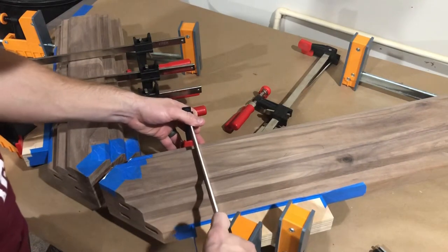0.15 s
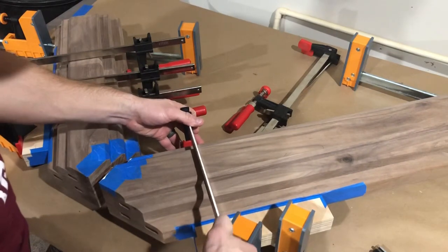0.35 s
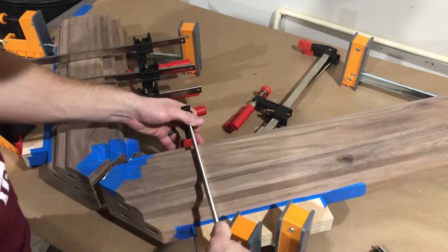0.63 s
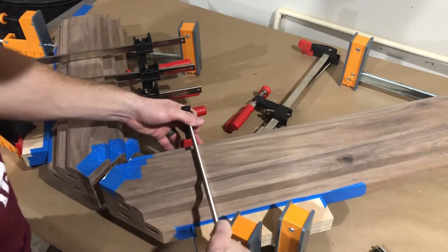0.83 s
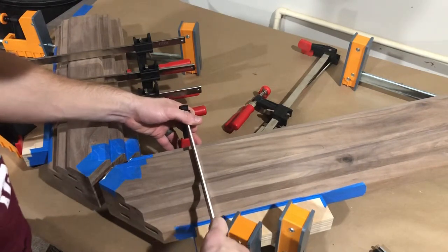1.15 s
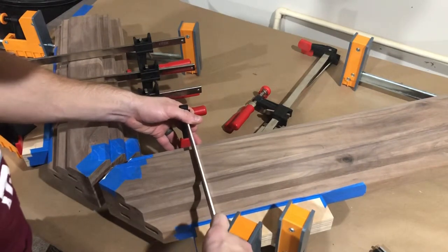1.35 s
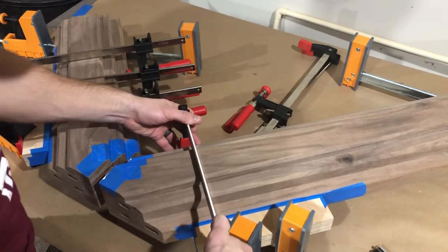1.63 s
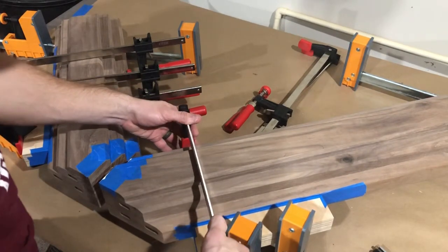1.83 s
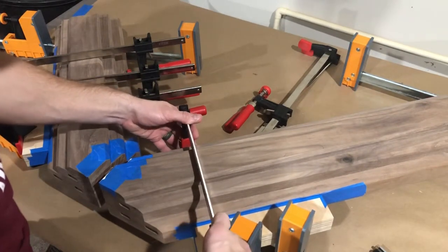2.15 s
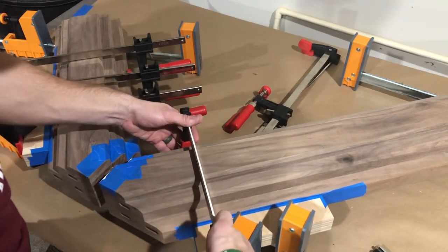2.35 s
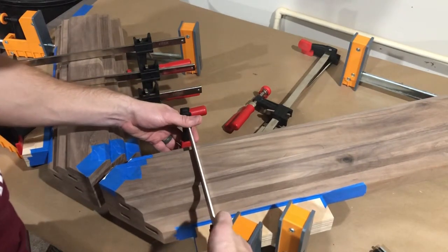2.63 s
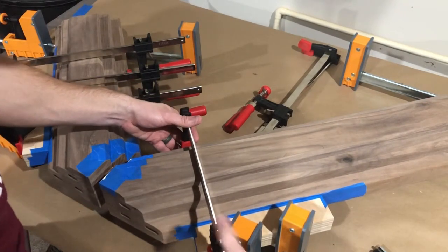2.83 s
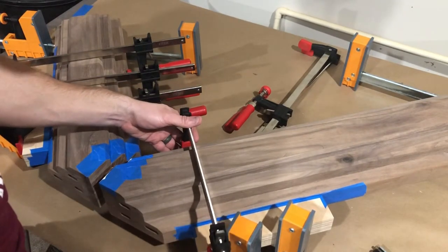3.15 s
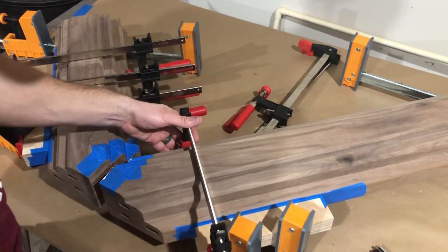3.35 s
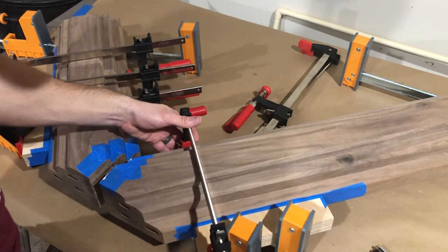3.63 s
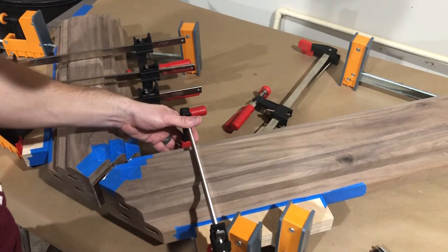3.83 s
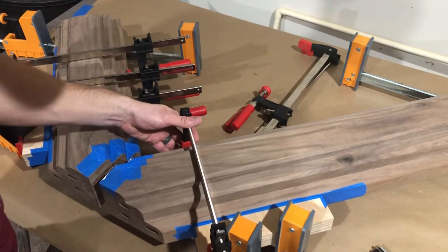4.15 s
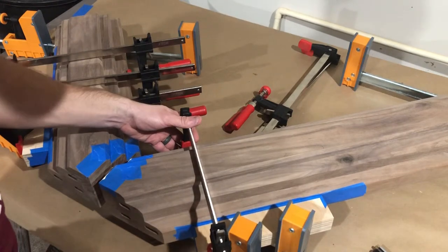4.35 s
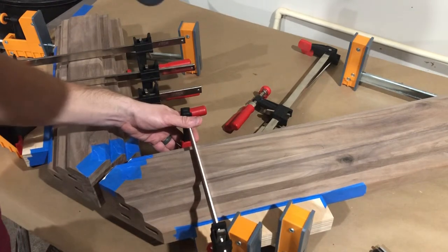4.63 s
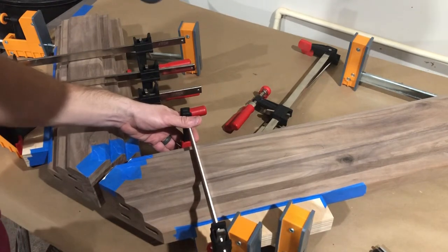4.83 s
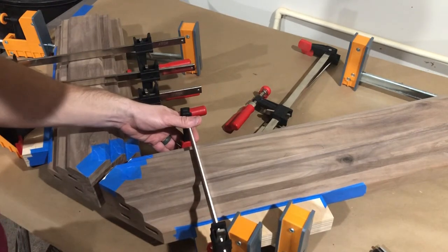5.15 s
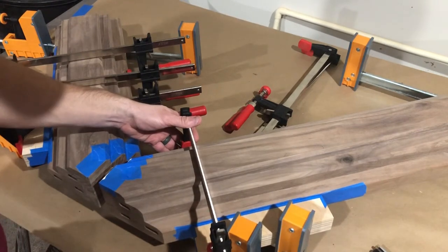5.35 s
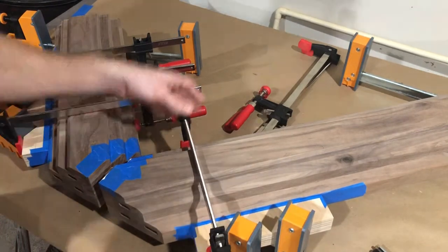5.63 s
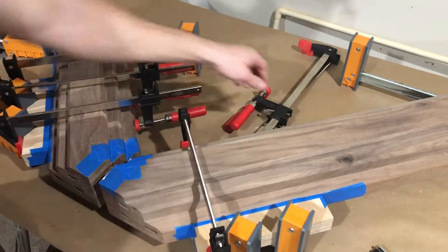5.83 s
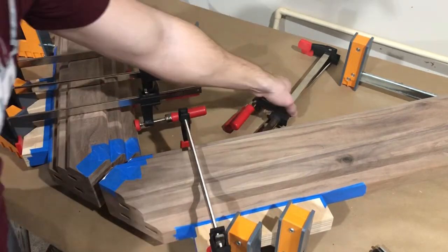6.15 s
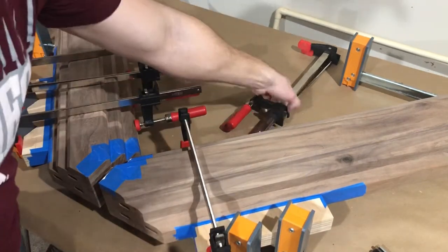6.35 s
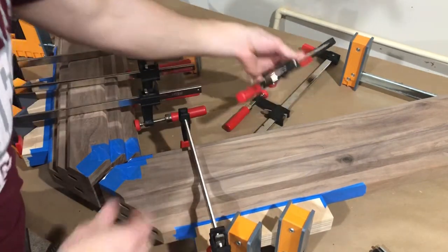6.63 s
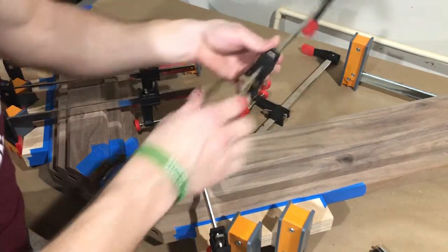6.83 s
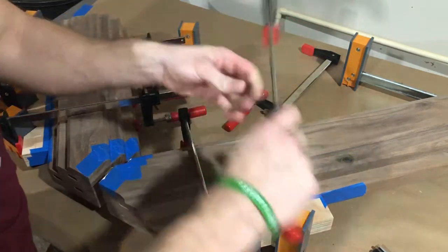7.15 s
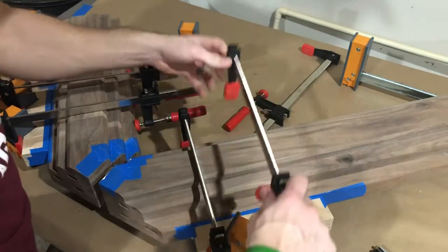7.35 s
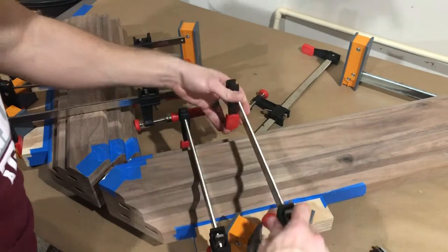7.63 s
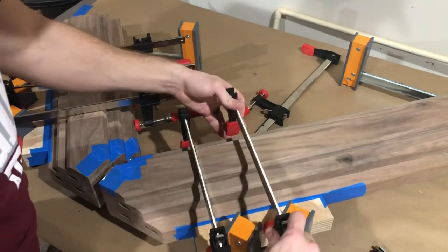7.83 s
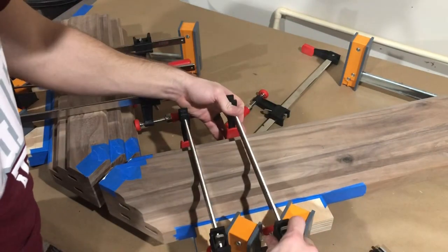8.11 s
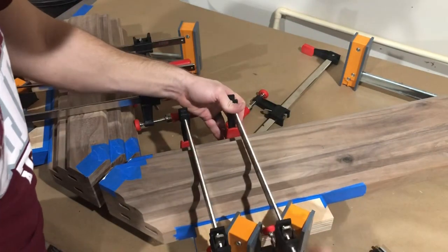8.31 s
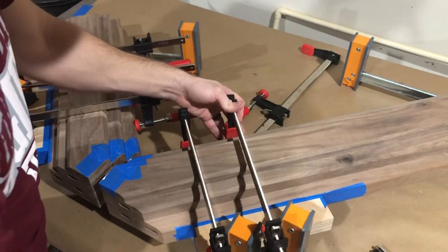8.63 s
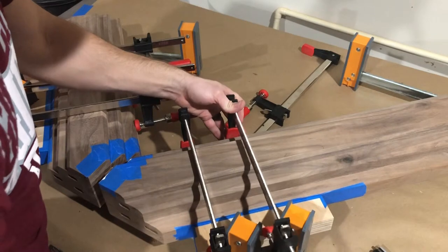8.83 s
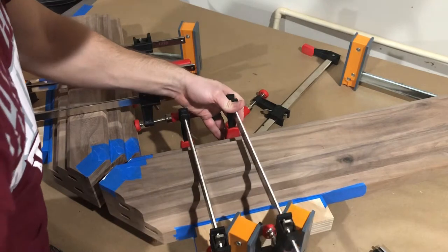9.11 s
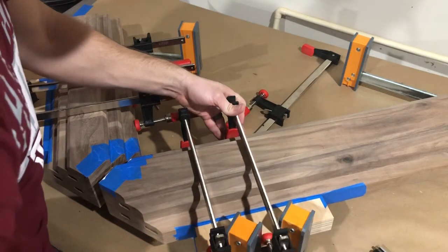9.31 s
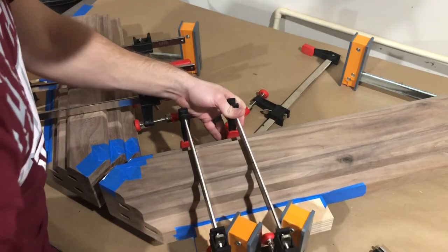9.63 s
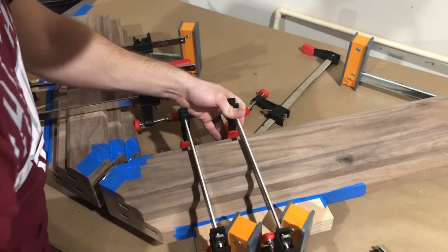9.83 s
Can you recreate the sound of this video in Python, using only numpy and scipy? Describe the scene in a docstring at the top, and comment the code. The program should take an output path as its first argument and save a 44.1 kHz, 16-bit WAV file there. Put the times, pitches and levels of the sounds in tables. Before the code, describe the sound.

Sharp metal clicks and dull wooden knocks as clamps are set across a panel, with a shoe scuff and a short squeak.

```python
"""Steel bar clamps are set across a glued wooden panel on a bench in a small, bare-walled workshop.
Over a low rumble, hands shift a clamp, its jaws click and chatter on the bar, and panel and bench knock.
From 3.4 s a screw rasps in its threads, then creaks. Near 6 s a shoe scuffs, a second clamp is dragged
over and a shirt rustles. More clicks and knocks follow; at 9.6 s the screw pad slips and squeaks as it
is tightened. The walls ring after every sound."""
import sys
import numpy as np
from scipy import signal
from scipy.fft import rfft, irfft
from scipy.io import wavfile
from scipy.ndimage import uniform_filter1d

SR = 44100
rng = np.random.default_rng(int(sys.argv[2]) if len(sys.argv) > 2 else 0)


def log_audio(samples):
    """Write samples as a 16-bit WAV file to the path given in sys.argv[1]."""
    # one column per channel
    frames = np.atleast_2d(samples).T
    # limit to full scale, then quantise
    limited = np.clip(frames, -1, 1)
    pcm = np.round(limited * 32767).astype(np.int16)
    wavfile.write(sys.argv[1], SR, pcm)


N = 440118
TIME_S = np.arange(N) / SR


def undb(db):
    """Decibels to gain."""
    return 10 ** (np.asarray(db) / 20)


def unit(x):
    """Scale to rms 1."""
    return x / np.sqrt(np.mean(x ** 2))


def energy(x, seconds):
    """Scale to the energy of an rms-1 sound of that length."""
    return x * np.sqrt(seconds * SR / np.sum(x ** 2))


def lookup(rows, hz):
    """Read (f/Hz, value) rows on a log-frequency axis."""
    f, value = np.transpose(rows)
    return np.interp(np.log(hz + 1), np.log(f), value)


def colour(x, gain_db, size=4096):
    """Minimum-phase filter with response gain_db(f/Hz)."""
    cepstrum = irfft(np.log(undb(gain_db(np.arange(size // 2 + 1) * SR / size))))
    cepstrum[1:size // 2] *= 2
    cepstrum[size // 2 + 1:] = 0
    return signal.fftconvolve(x, irfft(np.exp(rfft(cepstrum))))[:len(x)]


def ring(modes, t):
    """Decaying modes, struck at a new place each time."""
    hz, db, t60_s = np.transpose(modes)[:, :, None]
    detune, polarity, scatter = rng.standard_normal((len(modes), 3)).T[:, :, None]
    phase = 2 * np.pi * hz * (1 + 0.0056 * detune) * t
    gain = np.sign(polarity) * undb(db + 2 * scatter)
    return np.sum(gain * np.sin(phase) * np.exp(-np.log(1000) * t / t60_s), axis=0)


def add(track, start_s, sound):
    """Mix a sound in at start_s."""
    i = max(int(start_s * SR), 0)
    track[i:i + len(sound)] += sound[:N - i]


def strokes(rows, attack_s, release_s):
    """Envelope of (t/s, hold/s, level/dB) strokes; attack and release are times per 20 dB."""
    gains = []
    for start_s, hold_s, db in rows:
        before = np.maximum(start_s - TIME_S, 0) / attack_s
        after = np.maximum(TIME_S - start_s - hold_s, 0) / release_s
        gains.append(undb(db - 20 * np.minimum(before + after, 10)))
    return np.max(gains, axis=0)


def friction(pressure, spectrum, rate_hz, scatter_db, jerk_db):
    """Tiny catches of uneven size, coming in jerks, coloured by what they shake."""
    catches = (rng.random(N) < rate_hz / SR) * rng.standard_normal(N)
    catches *= undb(scatter_db * rng.standard_normal(N))
    jerks = unit(uniform_filter1d(uniform_filter1d(rng.standard_normal(N), size=500), size=500))
    return pressure * unit(colour(catches * undb(jerk_db * jerks), lambda f: lookup(spectrum, f)))


# background spectrum: f/Hz, level/dB
AIR_SPECTRUM = [(15, -66), (25, -47), (53, 4), (92, 0.5), (157, -4.5), (249, -14.5), (293, -9),
                (427, -12.5), (545, -20.5), (659, -22), (775, -27), (936, -22), (1130, -26), (14800, -33.5),
                (16000, -34)]
def air(level_db=-66):
    """Steady low rumble and thin hiss of the workshop."""
    return undb(level_db) * unit(colour(rng.standard_normal(N), lambda f: lookup(AIR_SPECTRUM, f)))


# grip shifts: t/s, hold/s, level/dB
GRIP_SHIFTS = [(0.01, 0.033, -59.5), (1.1, 0.094, -65.5), (1.57, 0.068, -62), (3.4, 0.15, -65.5),
               (4.06, 0.062, -60.5), (5.36, 0.063, -62), (7.14, 0.27, -66.5), (8.85, 0.084, -61),
               (9.71, 0.016, -57)]
# rubbing on wood: f/Hz, level/dB
GRIP_SPECTRUM = [(40, -20), (140, 4.5), (320, -2), (700, -7.5), (1300, -17), (3000, -25), (8000, -31),
                 (16000, -47)]
def hand_rub(holding_db=-70.5):
    """Hands shift the clamp on the wood and rub faintly between shifts."""
    pressure = np.hypot(strokes(GRIP_SHIFTS, attack_s=0.12, release_s=0.18), undb(holding_db))
    return friction(pressure, GRIP_SPECTRUM, rate_hz=1500, scatter_db=0, jerk_db=3.5)


# hard contacts: t/s, level/dB over 10 ms, chatter/ms, main f/Hz, second f/Hz, ring/dB, tilt/(dB/octave)
CONTACTS = [(0.05, -54, 10, 8020, 5660, 17.5, -7), (0.317, -31, 4.5, 10050, 5000, 8, -3),
            (0.348, -43.5, 15.3, 7400, 5820, 18, -7), (0.4252, -46, 4, 3200, 5000, 12, -3.5),
            (0.439, -47.5, 5.1, 7250, 9550, 12, -6), (1.438, -45.5, 2.8, 7800, 8870, 14, -4.5),
            (2.152, -64, 13, 1410, 4830, 17, -6), (2.293, -44.5, 18, 11300, 2800, 17, -1.5),
            (2.31, -38, 27.5, 11400, 2940, 17, -1.5), (2.33, -33, 11.4, 13200, 10300, 11, -4.5),
            (2.336, -34, 8, 9700, 13400, 10, -3.5), (3.282, -61, 2.5, 3720, 6850, 20, -3),
            (4.3613, -58.5, 2.4, 14170, 15200, 15, -7.5), (4.648, -41, 3, 1857, 2740, 8.5, -11),
            (4.939, -68, 0.93, 8600, 6000, -4, 1), (5.349, -62, 19, 1540, 9900, 15, -5),
            (5.857, -48.5, 4, 2700, 1900, 21, -1), (5.965, -38.5, 1.14, 2140, 2970, 25, 0),
            (6.2265, -41, 1.2, 11540, 7560, 16, -3.5), (6.441, -57, 2.2, 5530, 7500, 23, -8),
            (6.471, -49, 2.5, 5500, 8300, 16, -6), (6.733, -59.5, 1.3, 2000, 3320, 21, -5.5),
            (7.047, -55.5, 2.9, 4060, 2480, 13, -12.5), (7.147, -54.5, 13, 4140, 2290, 6, -8.5),
            (7.233, -47, 7.7, 7700, 6100, 20, -4.5), (7.2406, -44.5, 1.9, 11200, 7700, 13, -3),
            (7.2805, -44, 2, 14100, 5750, 12, -4.5), (7.289, -46, 4.8, 6160, 7600, 16, -1.5),
            (7.485, -61.5, 3, 4400, 5500, 12, -12), (7.955, -49, 6.2, 1930, 1435, 19, -15.5),
            (7.9667, -34, 3.8, 5450, 14400, 15, -2), (7.9762, -28.5, 2.4, 5600, 7600, 7.5, 0),
            (8.065, -46, 6.2, 6260, 5300, 8, -6), (8.6737, -27.5, 2.4, 8260, 6000, 21, 1),
            (8.7192, -39, 0.57, 8050, 5630, 32, -8), (8.723, -39.5, 6.2, 7100, 8400, 13, -4.5),
            (8.8205, -46.5, 4, 8600, 5950, 5, -4), (9.052, -53.5, 5.2, 5760, 8200, 13, -10.5),
            (9.0657, -33, 1.14, 7540, 11500, 8, 1), (9.2766, -43, 2.8, 11350, 10000, 23.5, -7),
            (9.294, -35, 1.44, 3650, 4250, 6.5, -3.5), (9.504, -35, 3.7, 8760, 3330, 5.5, -5.5)]
# steel contact: f/Hz, level/dB
STEEL_SPECTRUM = [(300, -23), (1000, -16.5), (2400, -10), (3800, -3.5), (5700, -0.5), (7700, -1.5),
                  (9500, -6), (12000, -5.5), (15500, -6)]
# bar and jaw modes: f/Hz, level/dB, t60/s
BAR_MODES = [(3080, -8, 0.058), (3504, -23.5, 0.051), (5560, -2, 0.053), (5600, -4.5, 0.072),
             (7100, -26.5, 0.63), (7570, -1, 0.023), (10300, -0.5, 0.066), (11200, -10, 0.12)]
def steel_clicks(contacts, bar_db=-20, jaw_db=-26, jaw_t60_s=0.13, width_hz=430, bounce_db=4.5):
    """Steel chatters on steel; two jaw pitches and the bar ring on. Returns direct sound and room send."""
    direct, send = np.zeros(N), np.zeros(N)
    t = np.arange(SR // 4) / SR
    impulse = signal.unit_impulse(len(t))
    for start_s, db, chatter_ms, main_hz, second_hz, ring_db, tilt_db in contacts:
        age = t * 1000 / chatter_ms
        envelope = (1 - np.exp(-age / 0.042)) / (1 + np.exp(np.minimum((age - 0.6) / 0.55, 50)))
        bounces = undb(bounce_db * np.repeat(rng.standard_normal(len(t)), 16)[:len(t)])
        chatter = energy(envelope * bounces * rng.standard_normal(len(t)), 1)
        snap = 2 * np.exp(-chatter_ms / 2.05) * energy(impulse, 1)  # dominates brief contacts
        jaw_modes = [(main_hz, 0, jaw_t60_s), (second_hz, 0, jaw_t60_s)]
        ringing = undb(bar_db) * energy(ring(BAR_MODES, t), 1)
        ringing += undb(jaw_db) * energy(ring(jaw_modes, t), 1)
        peak = lambda f, hz: 1 / (1 + ((f - hz) / width_hz) ** 2)
        jaw = lambda f: ring_db * (peak(f, main_hz) + 0.75 * peak(f, second_hz))
        steel = lambda f: lookup(STEEL_SPECTRUM, f) + tilt_db * np.log2(np.maximum(f, 1200) / 5000)
        click = colour(energy(chatter + snap, 0.68) + ringing, lambda f: steel(f) + jaw(f))
        add(direct, start_s, undb(db) * energy(click, 0.01))
        # walls gather all directions: smoother spectrum
        diffuse = colour(energy(impulse, 0.49) + ringing, lambda f: steel(f) + 0.61 * jaw(f))
        send_db = -6 + 1.34 * np.log2(chatter_ms / 3.2)
        add(send, start_s + chatter_ms / 1000 / 3, undb(db + send_db) * energy(diffuse, 0.01))
    return direct, send


# blows on panel and bench: t/s, level/dB over 30 ms, centre f/Hz, damping time/ms
BLOWS = [(0.317, -48.5, 650, 100), (0.353, -50.5, 526, 38), (0.647, -57, 490, 50), (0.706, -59.5, 320, 58),
         (1.445, -56, 516, 140), (2.159, -56.5, 890, 58), (2.297, -49.5, 524, 90), (2.343, -40.5, 612, 9.2),
         (2.347, -35, 283, 38), (3.208, -53, 734, 126), (3.282, -59, 850, 33), (3.322, -55.5, 287, 50),
         (3.918, -59.5, 238, 42), (4.115, -57, 256, 130), (4.538, -51, 233, 240), (4.648, -38.5, 1006, 22),
         (4.651, -38, 344, 125), (6.09, -49.5, 136, 88), (6.169, -54, 410, 16), (7.731, -64, 490, 90),
         (7.982, -42, 289, 240), (8.079, -48.5, 354, 35), (8.591, -53, 440, 63), (8.68, -48.5, 490, 240),
         (8.73, -46.5, 620, 64), (8.8, -51.5, 615, 76), (9.068, -52, 613, 53), (9.281, -53, 465, 72),
         (9.5025, -40, 666, 10), (9.507, -36, 216, 42)]
# panel and bench modes: f/Hz, level/dB, t60/s
WOOD_MODES = [(70.3, 10.5, 0.52), (136.5, 5.5, 0.23), (156, 0, 0.78), (184, -11, 0.13), (212, 2.5, 0.33),
              (249.2, -1, 0.24), (307.7, -4, 0.37), (351, 1.5, 0.13), (390.7, -4.5, 0.25),
              (490, -0.5, 0.15), (626.5, 3.5, 0.1), (734, -1.5, 0.036), (710, -7, 0.034),
              (883, -2.5, 0.064), (958, 6, 0.025), (1250, 0, 0.0305), (1385, 1.5, 0.043), (1616, 2, 0.0254)]
def wood_knocks(crack_db=-2, crack_s=0.0094, crack_hz=1500, skirt_db=10):
    """Blows ring the wood and hands damp it; the freer the panel, the more of its modes speak."""
    track, t = np.zeros(N), np.arange(SR // 3) / SR
    for start_s, db, centre_hz, damp_ms in BLOWS:
        burst = rng.standard_normal(len(t)) * np.exp(-t / crack_s)
        crack = colour(burst, lambda f: -10 * np.log10(1 + (f / crack_hz) ** 2))
        body = energy(ring(WOOD_MODES, t), 0.99) + undb(crack_db) * energy(crack, 0.24)
        damped = body * np.exp(-t * 1000 / damp_ms)
        spread_oct = 0.66 * (damp_ms / 100) ** 0.46
        band_db = lambda f: -skirt_db * np.log(1 + (np.log2((f + 1) / centre_hz) / spread_oct) ** 2 / 2)
        add(track, start_s, undb(db) * energy(colour(damped, band_db), 0.03))
    return track


# handle turns: t/s, hold/s, level/dB
TURNS = [(3.38, 0.09, -77), (3.84, 0.056, -80), (4.02, 0.031, -74), (4.18, 0.068, -73.5), (4.56, 0.29, -75),
         (8.44, 0.03, -78)]
# thread rasp: f/Hz, level/dB
THREAD_SPECTRUM = [(800, -1), (2500, -6), (6000, 3), (10000, -3.5), (15500, 3)]
def thread_rasp():
    """Screw threads rub as the handle turns. Returns sound and motion envelope."""
    turning = strokes(TURNS, attack_s=0.067, release_s=0.12)
    return friction(turning, THREAD_SPECTRUM, rate_hz=2200, scatter_db=1.5, jerk_db=2), turning


def steel_ticks(turning, arm_motion, screw_db=-6.5, jaw_db=-11):
    """Stray ticks from the screw as it turns and the loose jaw as the arm moves."""
    shaking = undb(screw_db) * turning + undb(jaw_db) * arm_motion
    return friction(shaking, STEEL_SPECTRUM, rate_hz=39, scatter_db=6, jerk_db=2)


def screw_creak(start_s=4.082, period_s=0.014, count=4, level_db=-65.5, swell_db=2.5):
    """The loaded screw catches at even intervals, strongest mid-run. Returns rows like CONTACTS."""
    chatter_ms, ring_hz, ring_db, tilt_db = 5.4, 2600, 9, -12
    return [(start_s + k * period_s, level_db + swell_db * np.sin(np.pi * k / count),
             chatter_ms, ring_hz, ring_hz, ring_db, tilt_db) for k in range(count)]


# shoe scuffs: t/s, hold/s, level/dB
SCUFFS = [(5.822, .015, -57), (5.894, 0.015, -38), (5.968, 0.012, -35.5)]
# sole friction: f/Hz, level/dB
SCUFF_SPECTRUM = [(150, -33), (450, -13), (850, -8.5), (1300, -1.5), (1900, -0.5), (2900, -3), (4300, -8.5),
                  (7500, -8), (12000, -11.5), (15500, -13)]
def shoe_scuff():
    """A sole scrapes the floor in quick strokes."""
    pressure = strokes(SCUFFS, attack_s=0.046, release_s=0.079)
    return friction(pressure, SCUFF_SPECTRUM, rate_hz=7000, scatter_db=3.5, jerk_db=2)


# pulls of the clamp: t/s, hold/s, level/dB
PULLS = [(5.96, 0.042, -59), (6.24, 0.022, -53), (6.335, 0.04, -44), (6.435, 0.022, -47.5),
         (6.525, 0.015, -46)]
# clamp on bench: f/Hz, level/dB
DRAG_SPECTRUM = [(35, -37), (60, -35), (124, 5.5), (178, -5.5), (247, 7), (276, -7.5), (316, -0.5),
                 (519, -8.5), (563, -7.5), (794, -19), (1600, -37), (2080, -82), (3520, -120)]
def clamp_drag():
    """The clamp catches and slides over the paper-covered bench with a low rumble."""
    pressure = strokes(PULLS, attack_s=0.074, release_s=0.054)
    return friction(pressure, DRAG_SPECTRUM, rate_hz=480, scatter_db=1, jerk_db=2.5)


# arm movements: t/s, hold/s, level/dB
ARM_MOVES = [(6.19, 0.1, -59), (6.5, .14, -66.5), (6.79, 0.12, -64), (7.08, 0.19, -64.5),
             (7.3, 0.037, -60.5)]
# cloth friction: f/Hz, level/dB
CLOTH_SPECTRUM = [(530, -26), (900, 0), (1040, -5), (1810, -4.5), (2190, -1), (2690, -6.5), (3230, -1),
                  (4100, 1), (5350, -8), (7140, -7.5), (9310, -11.5), (15100, -16), (16000, -32)]
def shirt_rustle():
    """Cloth rubs as the arm moves. Returns sound and motion envelope."""
    arm_motion = strokes(ARM_MOVES, attack_s=0.3, release_s=0.19)
    return friction(arm_motion, CLOTH_SPECTRUM, rate_hz=14000, scatter_db=4, jerk_db=2.5), arm_motion


# screw pad slips: t/s, f/Hz, peak level/dB
PAD_SLIPS = [(9.644, 5700, -26), (9.6555, 5600, -25.5), (9.663, 5910, -37), (9.700, 5615, -18),
             (9.7052, 5500, -17.5), (9.709, 5850, -23)]
def screw_squeak(half_width_ms=2.57, jitter_hz=35, octave_db=-19, tone_send_db=-9, octave_send_db=-20):
    """The screw pad slips in short, near-pure chirps. Returns direct sound and room send."""
    slip_s, slip_hz, _ = np.transpose(PAD_SLIPS)
    envelope = sum(undb(db) * np.exp(-((TIME_S - peak_s) * 1000 / half_width_ms) ** 2)
                   for peak_s, _, db in PAD_SLIPS)
    jitter = unit(uniform_filter1d(rng.standard_normal(N), size=80))
    pitch_hz = np.interp(TIME_S, slip_s, slip_hz) + jitter_hz * jitter
    phase = 2 * np.pi * np.cumsum(pitch_hz) / SR
    tone, octave = envelope * np.sin(phase), envelope * np.sin(2 * phase)
    return tone + undb(octave_db) * octave, undb(tone_send_db) * tone + undb(octave_send_db) * octave


# workshop decay: f/Hz, t60/s
WALL_DECAY = [(100, 0.74), (400, 0.71), (1200, 0.71), (3500, 0.65), (6000, 0.56), (10000, 0.43),
              (15000, 0.34)]
def wall_echoes(send, build_s=0.00053, early_db=3, early_s=0.017):
    """Dense echoes off bare walls, strongest at first; the treble dies soonest."""
    t, hz = np.arange(SR) / SR, np.arange(SR // 2 + 1)
    noise, tail = rfft(rng.standard_normal(SR)), np.zeros(SR)
    edges_hz = np.append(0, np.geomspace(150, SR / 2, 14))
    for lo, hi in zip(edges_hz, edges_hz[1:]):
        band = irfft(noise * ((hz >= lo) & (hz < hi)))
        tail += band * np.exp(-np.log(1000) * t / lookup(WALL_DECAY, (lo + hi) / 2))
    onset = (1 - np.exp(-(t / build_s) ** 2)) * undb(early_db * np.exp(-t / early_s))
    return signal.fftconvolve(send, energy(tail * onset, 1 / SR))[:N]


def scene(wood_send_db=-1.5, scuff_send_db=-2, handling_send_db=-4.5):
    """All sources, direct and off the walls; mono."""
    steel, steel_send = steel_clicks(CONTACTS + screw_creak())
    squeak, squeak_send = screw_squeak()
    wood, scuff = wood_knocks(), shoe_scuff()
    rasp, turning = thread_rasp()
    rustle, arm_motion = shirt_rustle()
    handling = hand_rub() + rasp + steel_ticks(turning, arm_motion) + clamp_drag() + rustle
    send = (steel_send + squeak_send + undb(wood_send_db) * wood
            + undb(scuff_send_db) * scuff + undb(handling_send_db) * handling)
    return (air() + handling + steel + wood + scuff + squeak + wall_echoes(send))[None]


def record(dry, low_hz=45, top_hz=16000):
    """The phone thins the deep bass and cuts the top."""
    thin = signal.sosfilt(signal.butter(2, low_hz, "high", fs=SR, output="sos"), dry)
    return signal.sosfilt(signal.ellip(10, 0.2, 70, top_hz, fs=SR, output="sos"), thin)


dry = scene()
out = record(dry)
log_audio(out)
```